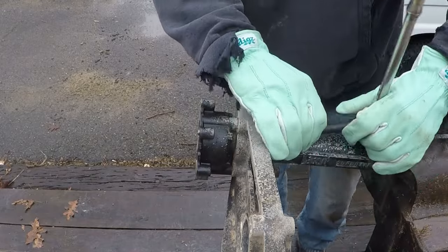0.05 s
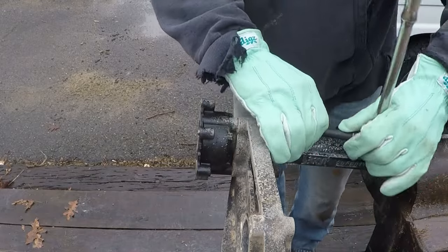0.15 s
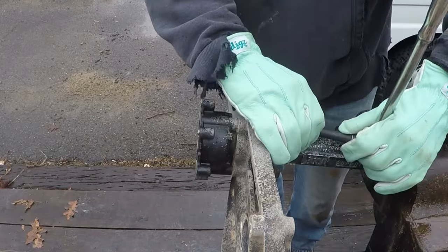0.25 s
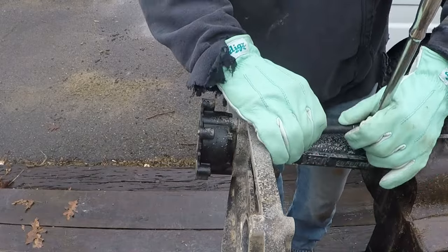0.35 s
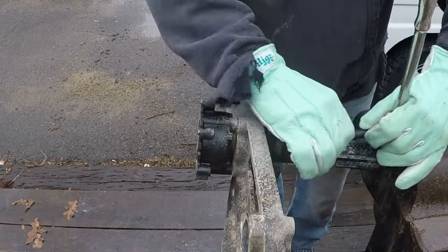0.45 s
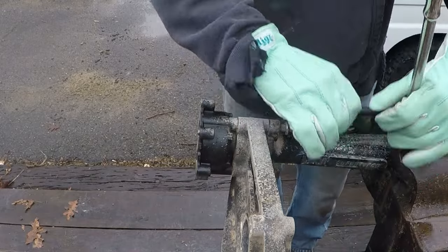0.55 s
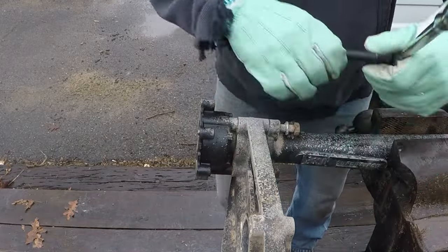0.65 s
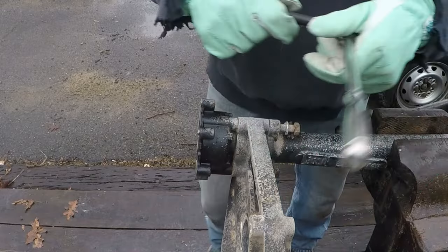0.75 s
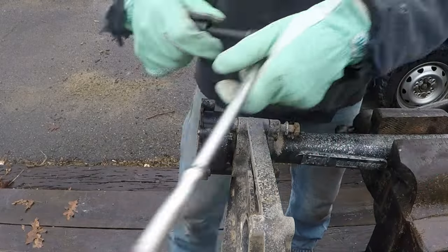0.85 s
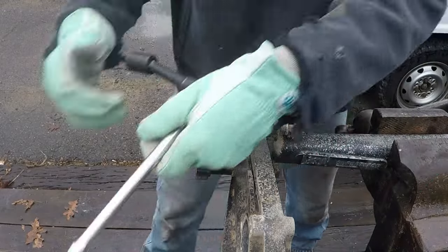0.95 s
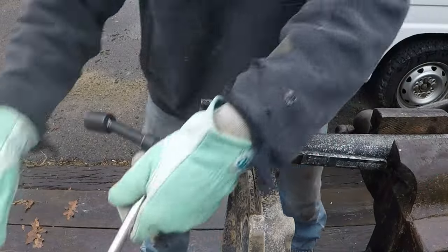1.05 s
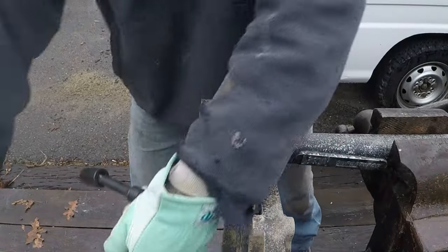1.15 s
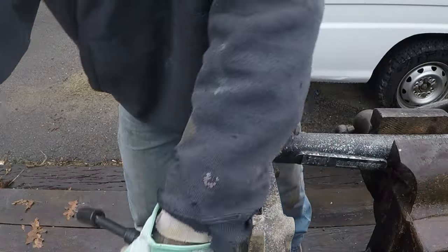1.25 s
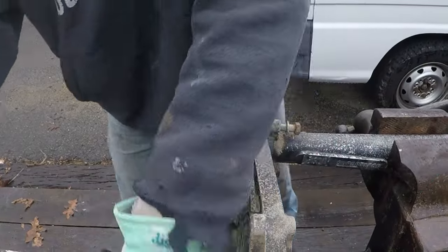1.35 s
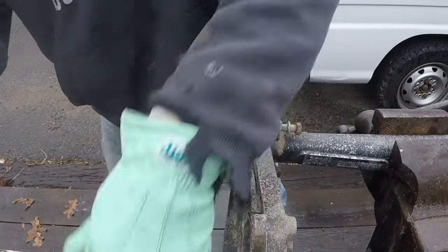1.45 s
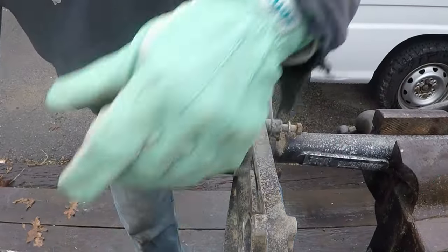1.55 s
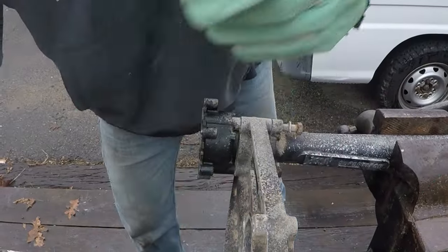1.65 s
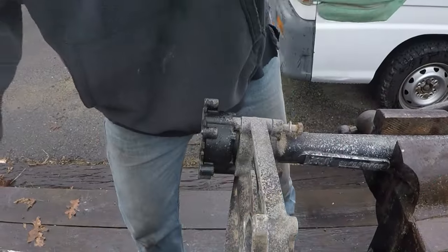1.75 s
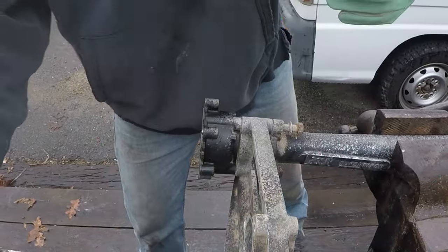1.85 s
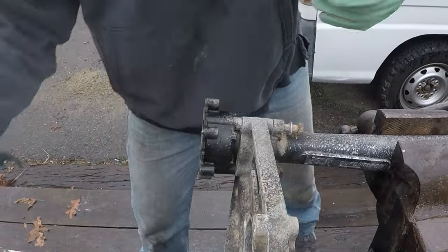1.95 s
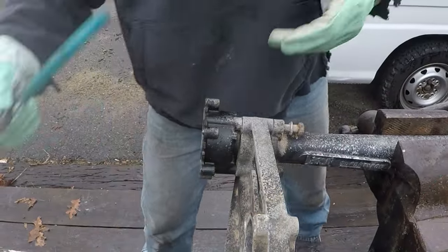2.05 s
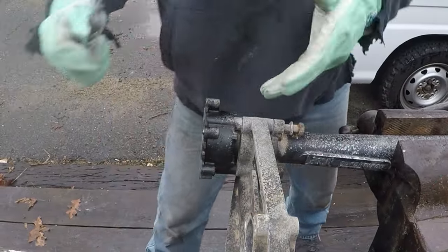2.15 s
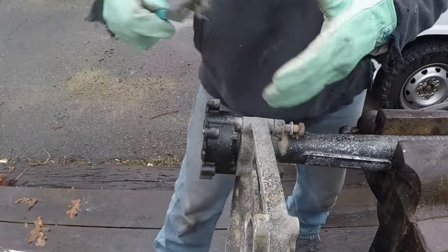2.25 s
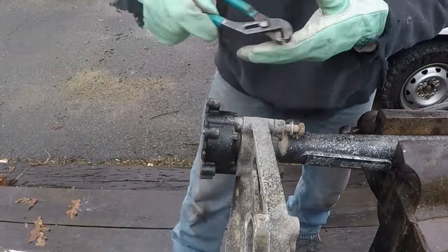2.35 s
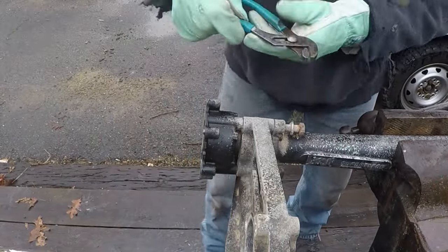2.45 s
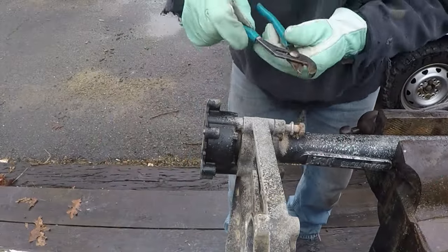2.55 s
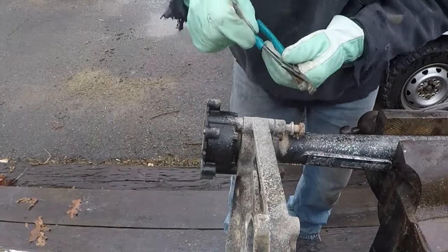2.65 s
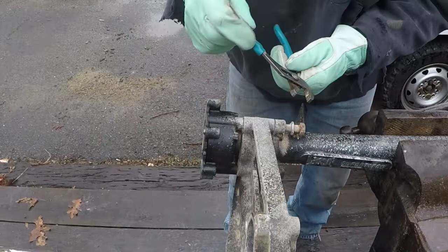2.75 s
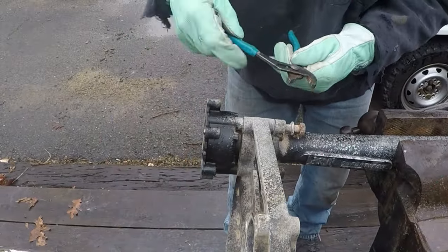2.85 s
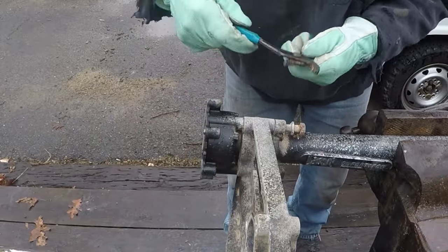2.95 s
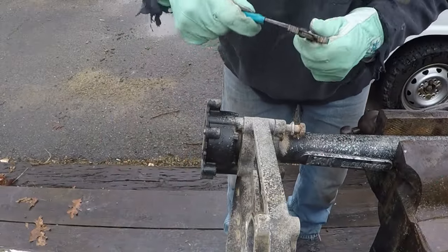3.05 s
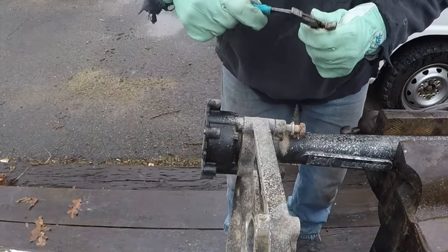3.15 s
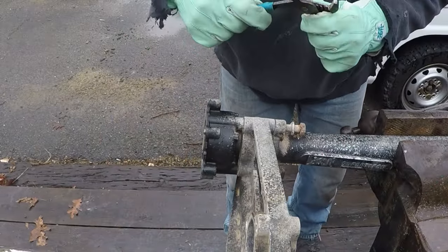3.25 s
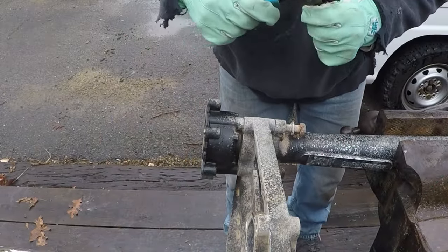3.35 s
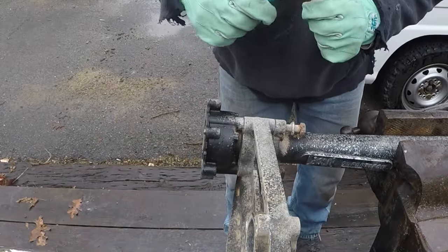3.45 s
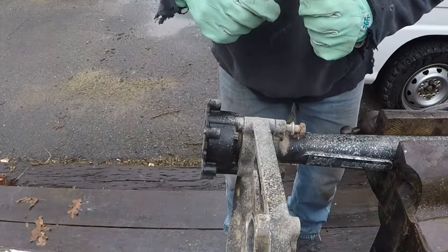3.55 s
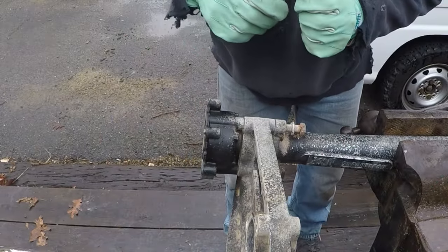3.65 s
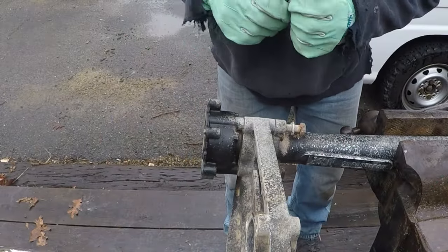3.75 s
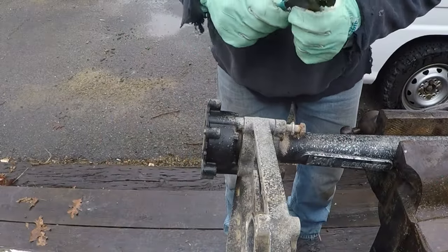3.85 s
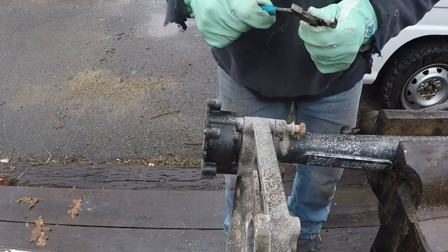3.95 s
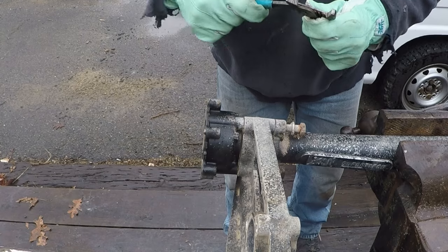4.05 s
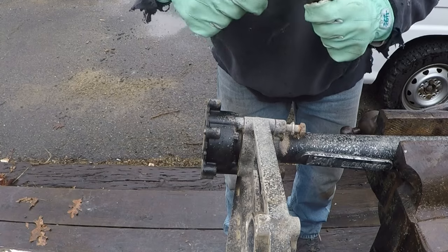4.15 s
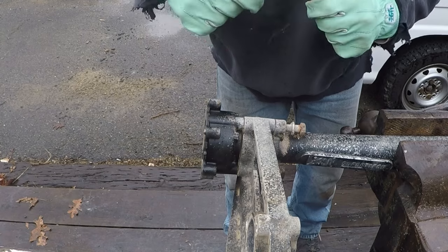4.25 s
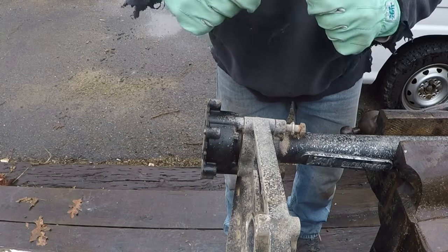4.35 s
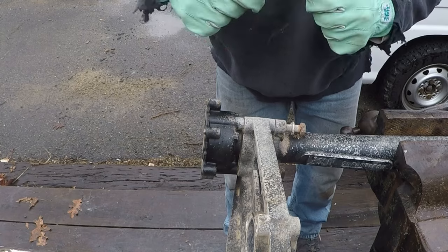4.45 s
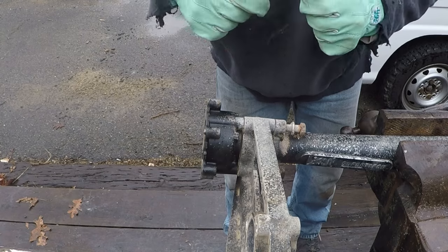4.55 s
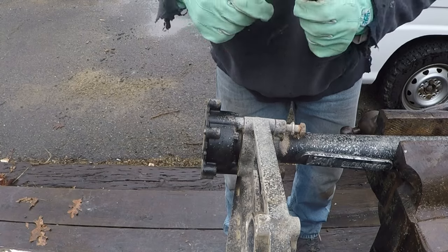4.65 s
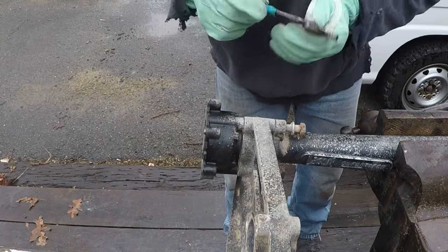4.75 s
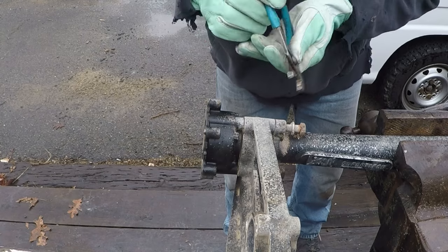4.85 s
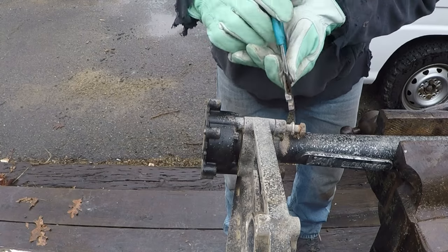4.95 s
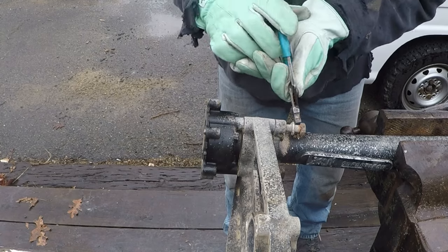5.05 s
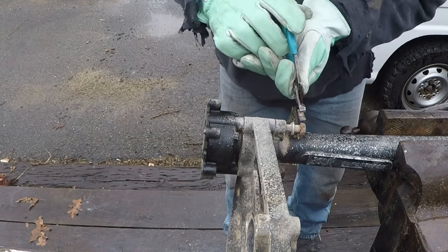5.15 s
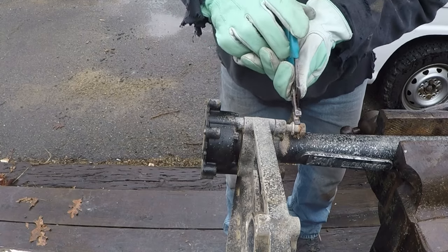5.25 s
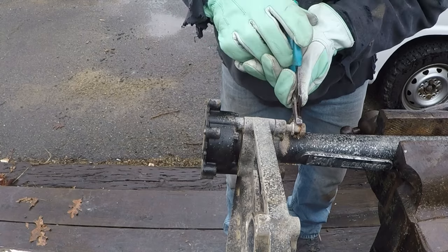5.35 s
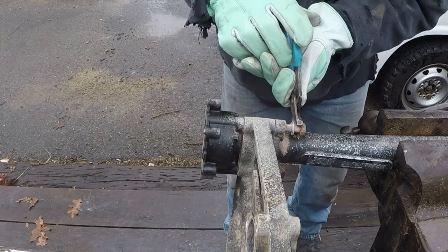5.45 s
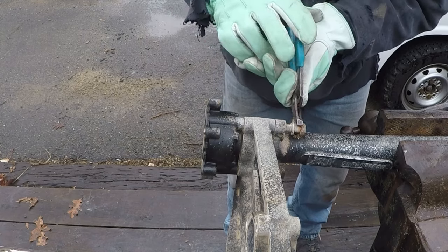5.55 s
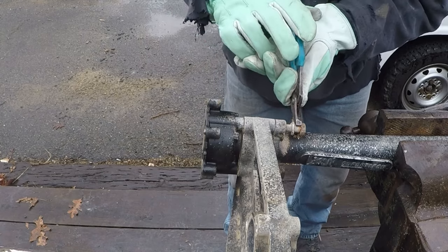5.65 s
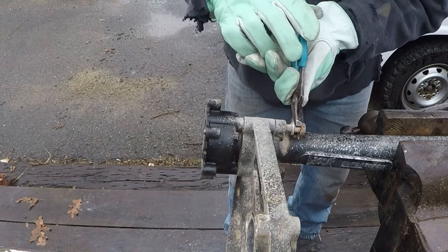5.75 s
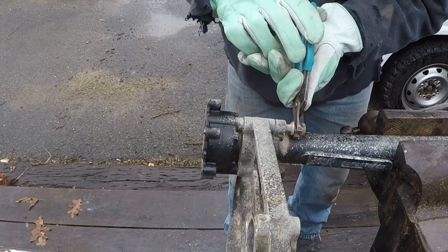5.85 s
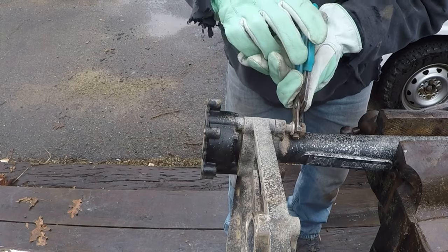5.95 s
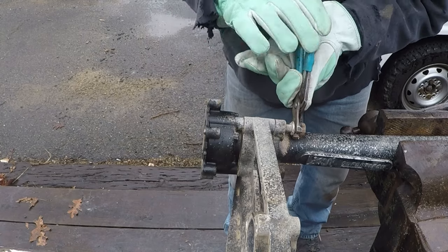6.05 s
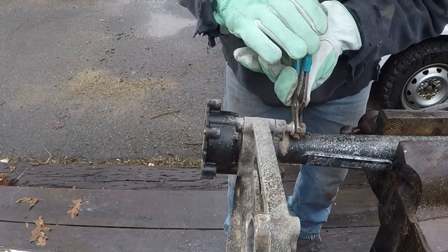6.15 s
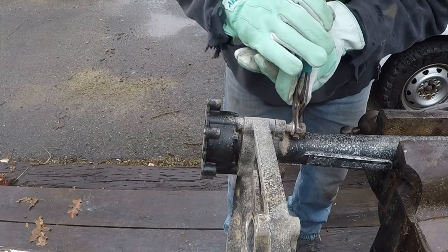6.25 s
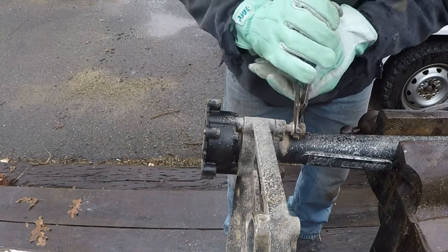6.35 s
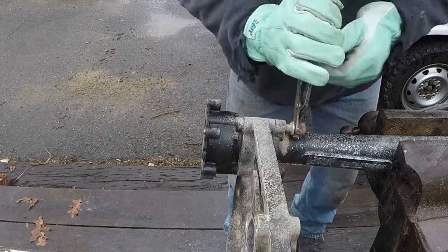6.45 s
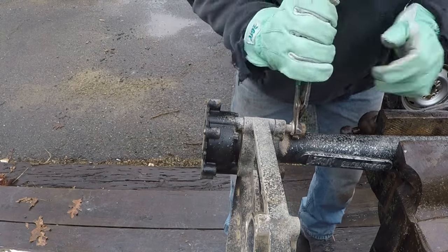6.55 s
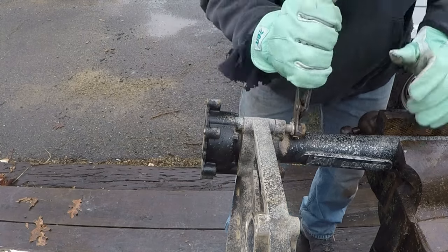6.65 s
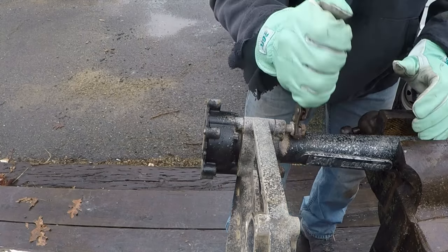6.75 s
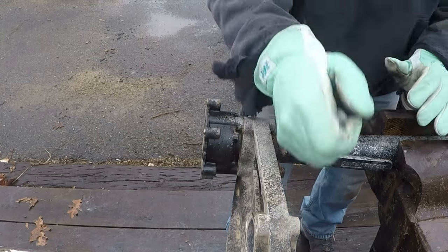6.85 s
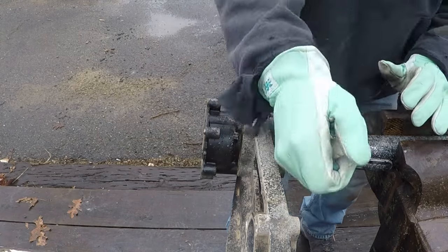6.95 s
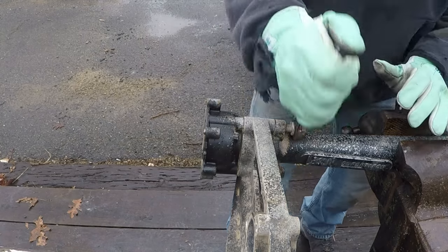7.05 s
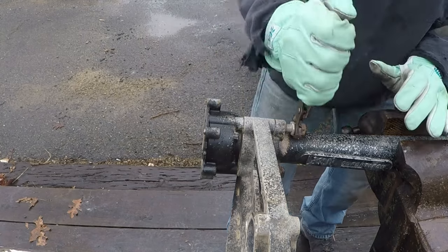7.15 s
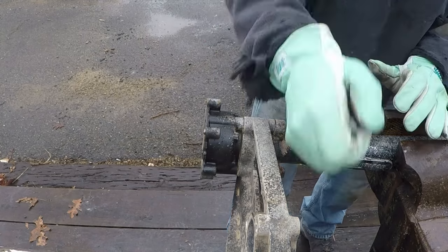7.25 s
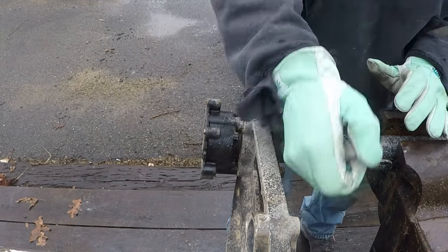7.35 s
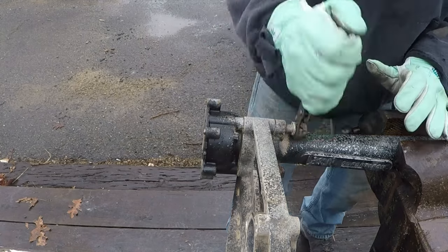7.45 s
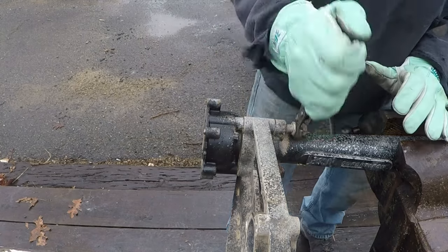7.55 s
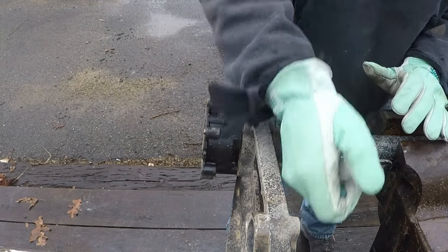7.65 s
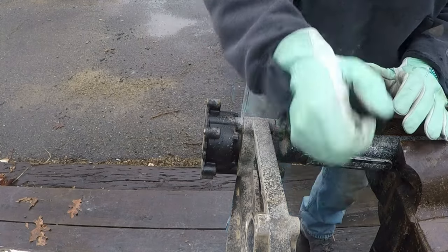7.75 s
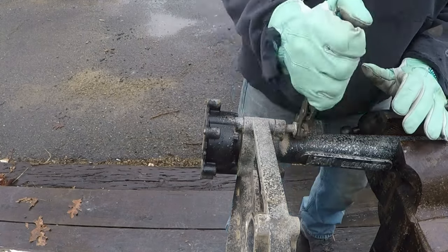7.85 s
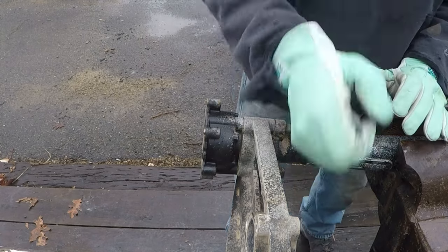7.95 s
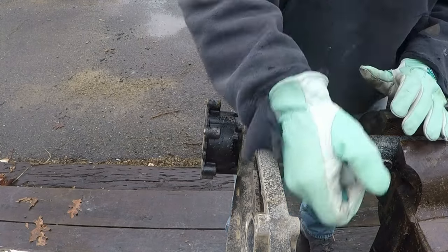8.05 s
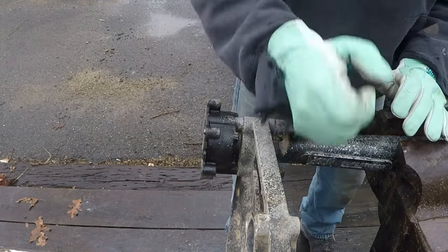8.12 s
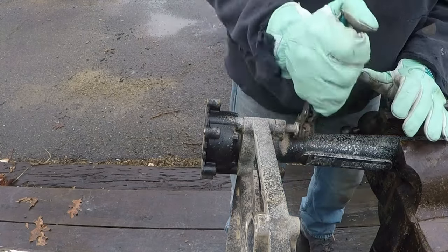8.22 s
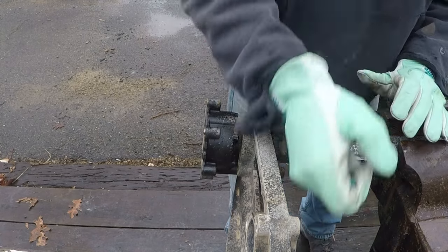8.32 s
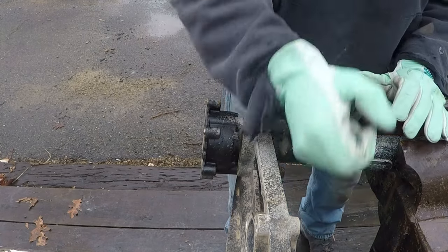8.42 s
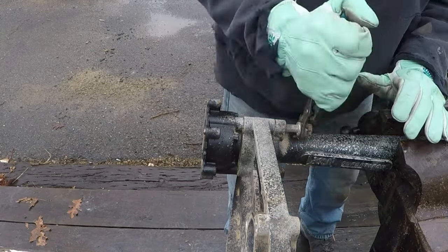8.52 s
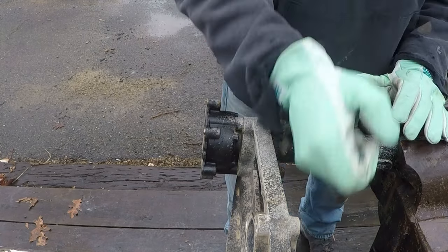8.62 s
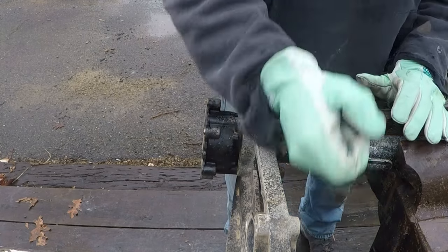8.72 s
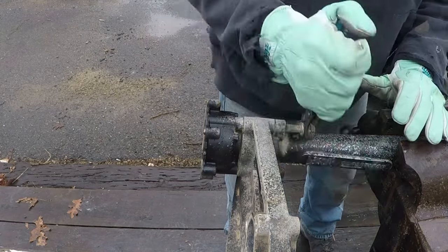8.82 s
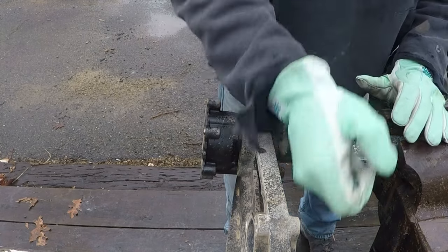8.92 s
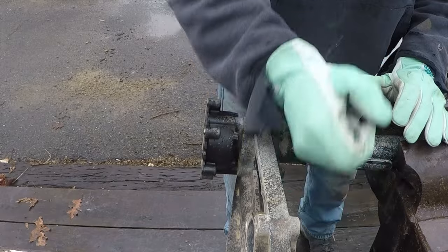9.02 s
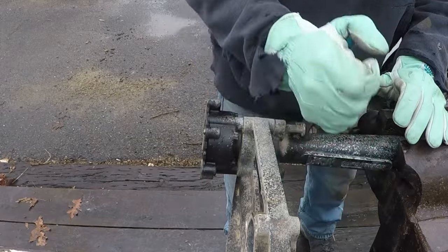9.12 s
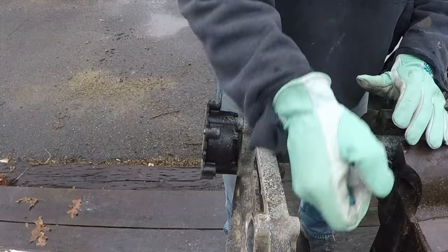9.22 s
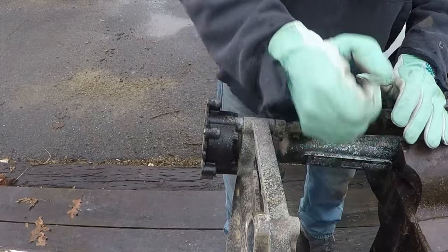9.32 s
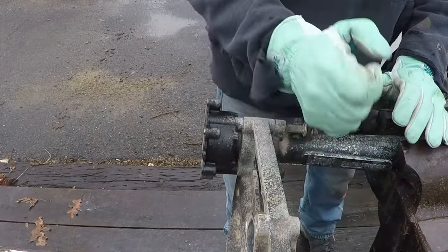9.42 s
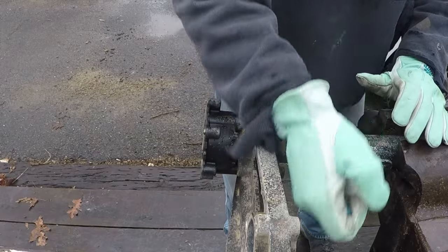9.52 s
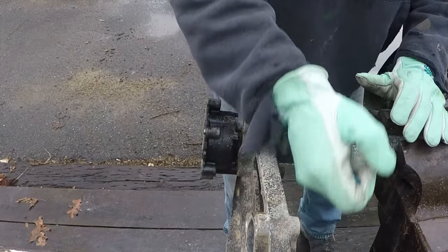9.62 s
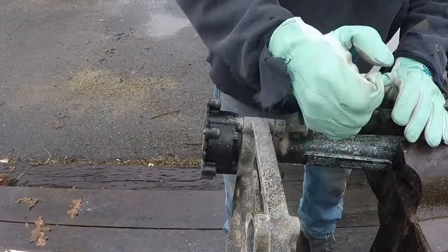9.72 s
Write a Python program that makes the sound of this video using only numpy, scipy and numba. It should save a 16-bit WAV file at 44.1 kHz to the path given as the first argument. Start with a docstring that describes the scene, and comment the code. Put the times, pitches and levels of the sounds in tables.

```python
"""Outdoors, on a trailer deck: a corroded bolt is worked out of an outboard leg lying there.
A far drone is filtered noise plus a thin whine; rubs are band noise; pushes excite modes of the swaying deck.
A wrench clinks and clatters on planks and pliers snap on: contact noise and struck modes.
The dry thread squeals in short stick-slip glides, a near sine that rings the housing.
The camera's gain control ducks the drone and lets it swell back."""
import sys
import numpy as np
from scipy import signal
from scipy.fft import rfft, irfft, next_fast_len
from scipy.io import wavfile
from scipy.ndimage import uniform_filter1d
from numba import njit

SR = 44100
rng = np.random.default_rng(int(sys.argv[2]) if len(sys.argv) > 2 else 0)


def output_pcm(signal):
    """Save a mono or channel-first signal as 16-bit PCM at the path in sys.argv[1].

    Samples are clipped to [-1, 1] before scaling.
    """
    pcm = np.clip(np.atleast_2d(signal).T, -1, 1) * 32767
    wavfile.write(sys.argv[1], SR, np.round(pcm).astype(np.int16))


N = 431298
T_S = np.arange(N) / SR

# All levels are relative, ahead of the source gains and the gain control.
# distant engines and traffic, spectral density: f/Hz, left level/dB, right level/dB
DRONE_SPECTRUM = [(30, -78, -69), (100, -73, -77), (159, -57, -60.5), (257, -63.5, -66), (287, -64.5, -56),
                  (352, -65.5, -76), (471, -54.5, -59), (517, -55.5, -58.5), (780, -50.5, -48),
                  (897, -60.5, -74), (1036, -50.5, -64), (1603, -59, -62.5), (1995, -54, -59.5),
                  (2214, -75, -69), (2390, -63.5, -70.5), (3580, -67, -76.5), (4720, -81, -77),
                  (6280, -68.5, -70.5), (9250, -82, -84.5), (11970, -99, -97.5), (15800, -120, -118)]
# swell and sink of the drone: t/s, level/dB
DRONE_LEVEL = [(0, -24.5), (1.9, -30), (3.9, -23.5), (6.4, -23.5), (7.5, -26), (9.78, -26)]
# mean pitch of a far machine's whine: t/s, f/Hz
WHINE_PITCH = [(0.0, 1047), (3.69, 1033), (4.53, 1041), (6.7, 1030)]
# gloves and sleeves dragging on the housing: t/s, length/s, level/dB
RUBS = [(-.02, .12, -20), (0.111, 0.077, -16), (0.18, 0.12, -20.5), (.372, 0.14, -17.5),
        (0.459, 0.13, -15.5), (0.502, 4, -37), (5.09, 0.18, -27), (5.287, 7.5, -37), (5.372, 0.095, -25),
        (5.487, 0.077, -29), (5.626, .12, -27.5), (5.788, .15, -22), (5.93, 0.083, -24),
        (8.99, 0.26, -21.5), (9.278, 0.098, -18.5), (9.45, .12, -28), (9.505, 0.13, -20.5),
        (9.61, 0.074, -22)]
# slow sway modes of the deck: f/Hz, level/dB, t60/s
SWAY_MODES = [(38, 8, .5), (75, 0, .17), (95, -3, .14), (145, -6, .1), (310, -12, .08)]
# single jolts of the deck: t/s, level/dB, length/s
JOLTS = [(0.555, -9.5, 0.02), (0.666, -14, 0.022), (1.107, -25.5, 0.0054), (1.352, 4, 0.0071),
         (1.477, -1.5, 0.006), (1.577, 3, 0.032), (2.6, -29, 0.011), (5.367, -5, 0.029), (5.637, -2, 0.034),
         (6.909, -6.5, 0.017)]
# pushes at the reversals of the tool: t/s, level/dB
STROKES = [(0, -14.5), (0.1, -3.5), (0.202, -5.5), (0.361, -11), (0.47, -7), (5.782, -12.5), (5.92, -18),
           (6.118, -21.5), (6.3, -22.5), (6.549, -17.5), (6.739, -22.5), (7.029, -9), (7.139, -10),
           (7.33, -5.5), (7.523, -6.5), (7.704, -5), (7.874, -4.5), (8.046, -4.5), (8.213, -5.5),
           (8.386, -4.5), (8.55, -6.5), (8.71, -6.5), (8.876, -8.5), (9.015, -6), (9.11, -6.5), (9.245, -9),
           (9.429, -11.5), (9.589, -7.5)]
# bumps of the work and landings of the wrench on the planks: t/s, level/dB, contact/s
THUMPS = [(.385, 1.5, .006), (.471, 3.5, 0.0054), (1.291, 14.5, 0.0022), (1.334, 23, 0.0034),
          (1.345, 24.5, 0.0037), (1.433, 27.5, 0.0038), (1.482, 17, .0027), (1.523, 15.5, 0.0029),
          (1.712, 14.5, 0.0072), (5.83, -13, .0025), (9.022, -5, .002), (9.172, -15, .001),
          (9.445, -12, .001)]
# low modes of the planks: f/Hz, level/dB, t60/s, phase between microphones/rad
PLANK_MODES = [(89, 0, 0.16, 0.91), (101.8, -2, .13, 1.3), (134, 0, 0.24, 2.7), (182, 5.5, 0.16, 2.45),
               (234, 2.5, 0.22, 2.93), (322, -1, .14, 2.05)]
# wrench and socket clattering on one board: t/s, level/dB, contact/s
CLACKS = [(1.28, -13, 0.00046), (1.287, 18.5, .0021), (1.323, 12, 0.0006), (1.327, 5, .0004),
          (1.346, 9, 0.00045), (1.35, 3, .0003), (1.359, 8, 0.00064), (1.39, 3, 0.0012),
          (1.419, 12.5, .0003), (1.423, 13, 0.00044), (1.429, 19, 0.0012), (1.437, 8, 0.00051),
          (1.456, 7, .0005), (1.487, 7, 0.0012), (1.529, 7, 0.0016), (1.543, -1, 0.0014)]
# modes of that board: f/Hz, level/dB, t60/s, phase between microphones/rad
BOARD_MODES = [(216, -3, 0.12, 2.6), (292, -7.5, 0.086, 2.36), (373, 0, 0.1, 2.9), (485, 2, .06, 2.43),
               (550, 2, 0.067, 2.9), (785, -16, 0.028, 1.1), (1095, -8, 0.035, 1.6),
               (1450, -5.5, 0.041, 1.5), (1620, -14, 0.027, 1)]
# clinks of the wrench: t/s, crack level/dB, lowest crack f/Hz, ring level/dB
CLINKS = [(.43, -30, 1300, -38), (0.466, -16, 1200, -10), (.482, -32, 3000, -27), (1.286, -24.5, 3500, -36),
          (1.326, -22, 1500, -38), (1.411, -19, 3000, -18), (1.418, -8, 3460, -6.5),
          (1.483, -6.5, 4230, -17), (1.519, -18, 3980, -14), (1.966, -30, 3420, -38),
          (2.22, -44, 3500, -41), (4.54, -42, 3500, -36)]
# modes of the wrench: f/Hz, level/dB, t60/s, phase between microphones/rad
WRENCH_MODES = [(3895, -9, .035, .3), (3960, -6.5, 0.054, .3), (4000, -17, 0.13, 1), (6650, -12, .06, 1),
                (6700, -7.5, 0.094, .95), (6800, -13, 0.037, 1.1), (7650, -21, .1, 1.2),
                (9580, -16, .05, 1.7)]
# pliers snapping shut, then seating on the bolt head: t/s, level/dB
SNAPS = [(5.042, -17.5), (5.367, -32.5)]
# modes of the pliers: f/Hz, level/dB, t60/s, phase between microphones/rad
PLIERS_MODES = [(1470, 4.5, 0.071, 1.5), (1620, -5, .04, 1.1), (3770, -15, .06, 1),
                (4290, -4.5, 0.038, 1.2), (5800, -8, 0.078, 1), (6550, -3, 0.066, 1.5),
                (7440, -7, 0.13, 1.2), (8750, -12, .04, 1.9), (10600, -14, 0.093, 1)]
# swelling thud of the gripped part: f/Hz, level/dB, t60/s, phase between microphones/rad
THUD_MODES = [(151, 18, 0.13, 2.2), (175.5, 33.5, 0.11, 2.62), (205.7, 13.5, 0.29, 2.65),
              (258, 18.5, 0.088, 2.6)]
# squeals of the thread, one curve each, held notes and jumps: t/s, f/Hz, level/dB
SQUEALS = [
    [(6.685, 4780, -31), (6.715, 4680, -27), (6.752, 4950, -23), (6.762, 5150, -14), (6.849, 5170, -12)],
    [(6.841, 5690, -10), (6.875, 5600, -14), (6.889, 5220, -11), (6.922, 5190, -18)],
    [(6.97, 4550, -24), (6.993, 5150, -13), (7.045, 5200, -11)],
    [(7.036, 5560, -8), (7.085, 5540, -8), (7.098, 5680, -11), (7.115, 5600, -18)],
    [(7.168, 4780, -24), (7.186, 5000, -16), (7.192, 5160, -9), (7.21, 5190, -10)],
    [(7.197, 6040, -8), (7.222, 5900, -13), (7.245, 5780, -11), (7.285, 5780, -24)],
    [(7.238, 5600, -14), (7.249, 5380, -8), (7.26, 5380, -15)],
    [(7.258, 4800, -21), (7.283, 5130, -10), (7.305, 5100, -18)],
    [(7.357, 5110, -7), (7.435, 5100, -6), (7.448, 5020, -5), (7.497, 5010, -12)],
    [(7.562, 5600, -14), (7.585, 5570, -9), (7.6, 5550, -12), (7.608, 5400, -11), (7.622, 5430, -18)],
    [(7.635, 4790, -15), (7.68, 4770, -20)],
    [(7.709, 5620, -6), (7.752, 5630, -10), (7.762, 5800, -8), (7.815, 5880, -9), (7.828, 6070, -4),
     (7.848, 6080, -8)],
    [(7.914, 5430, -18), (7.935, 5430, -17), (7.962, 5430, -24)],
    [(7.93, 4790, -27), (7.968, 4720, -22), (7.978, 4500, -8), (7.988, 4150, -20), (8.003, 4620, -14),
     (8.025, 4790, -23)],
    [(8.053, 4880, -20), (8.07, 5070, -10), (8.1, 5190, -8), (8.109, 5500, -9), (8.135, 5720, -8),
     (8.153, 6050, -6), (8.163, 6550, -10), (8.18, 6680, -12), (8.21, 6620, -21)],
    [(8.255, 5800, -11), (8.27, 5650, -7), (8.287, 5650, -13), (8.294, 5430, -7), (8.308, 5430, -15)],
    [(8.393, 4400, -19), (8.406, 5000, -9), (8.428, 5150, -9), (8.44, 5500, -7), (8.465, 5650, -11),
     (8.477, 6080, -6), (8.49, 6250, -10), (8.497, 6650, -5), (8.508, 6650, -11)],
    [(8.718, 3800, -11), (8.738, 4020, -14), (8.746, 4550, -9), (8.778, 4880, -12), (8.795, 5170, -7),
     (8.812, 5230, -15)],
    [(8.927, 3450, -11), (8.938, 3680, -13), (8.951, 4300, -14), (8.965, 4700, -22)],
    [(8.987, 4400, -15), (8.994, 4180, -10), (9.001, 3550, -10), (9.008, 2900, -15), (9.018, 2750, -22)],
    [(9.019, 3300, -13), (9.026, 3600, -9), (9.037, 3950, -13), (9.047, 4500, -5), (9.066, 4680, -18),
     (9.084, 5080, -9), (9.11, 5200, -16)],
    [(9.28, 3950, -21), (9.294, 4130, -20), (9.3, 4300, -9), (9.306, 4750, -6), (9.313, 4930, -8),
     (9.335, 5170, -5), (9.346, 5210, -9), (9.356, 5480, -13), (9.373, 5600, -19)],
    [(9.673, 4950, -21), (9.695, 4900, -20)],
    [(9.708, 4930, -24), (9.738, 4900, -29)],
]
# rust catching in the thread: t/s, length/s, strength/1
CATCHES = [(7.033, 0.0096, 0.43), (7.201, 0.033, 0.5), (7.758, 0.017, 0.28), (7.973, 0.034, 0.2),
           (8.42, 0.068, 1), (8.939, .02, 0.51), (8.986, 0.06, .8)]
# modes of the cast housing: f/Hz, level/dB
HOUSING_MODES = [(3470, 14), (3620, 12), (4010, -11), (4245, 10.5), (4570, 8.5), (4790, 1), (5013, -1),
                 (5091, -2), (5165, 3), (5250, -16), (5431, 5), (5540, 6), (5770, 8), (5940, 15.5),
                 (6075, 2.5), (6197, 19.5), (6620, 5)]

WHINE_DB = -6.5  # mean, against the drone
RUB_PEAK = 0.23  # share of a rub spent swelling
PUSH_S = 0.014
KNOCK_HZ, KNOCK_T60_S, KNOCK_DB = 73.9, 0.098, 3  # nominal pitch
KNOCK_SCATTER = 0.19  # largest relative pitch deviation
PLANK_RISE_S, BOARD_RISE_S, THUD_RISE_S = 0.036, 0.0095, 0.093
STEADY_ROUGH, ROUGH_PER_OCT_S = 0.08, 0.037  # held squeal; added per octave per second of glide
GLIDE_ROUGH, GRAIN_ROUGH = .55, 0.22  # most added by a glide; most added by a slow, low slip
JUMP_DB = -3  # level change at full roughness
SLUR_S, ROUGH_SLUR_S = 0.0044, .01  # smoothing of pitch and of roughness
SLIP_ATTACK_S, SLIP_RELEASE_S = .0085, .0085
CHATTER_HZ, CHATTER_DEPTH = 618, 1  # depth in rad, per unit of catch
OVERTONE_GROWTH, OVERTONE_FALL_DB_PER_HZ = .5, 0.3  # growth in dB per dB of squeal
TOP_HZ = 15300


def undb(db):
    """Decibels to gain."""
    return 10 ** (np.asarray(db) / 20)


def unit(x):
    """Scale to rms 1."""
    return x / np.sqrt(np.mean(x ** 2))


def walk(rate_hz, size=N):
    """Smooth random control, about rate_hz changes per second, spread about 1."""
    k = max(int(SR / rate_hz), 1)
    steps = np.repeat(rng.standard_normal(size // k + 1), k)
    return 1.418 * uniform_filter1d(uniform_filter1d(steps, k), k)[:size]


def slur(x, seconds):
    """Round off the corners of a control."""
    k = max(int(seconds * SR), 1)
    return uniform_filter1d(uniform_filter1d(x, k), k)


def add(out, start_s, x):
    """Mix x into out from start_s."""
    i = max(int(start_s * SR), 0)
    out[..., i:i + x.shape[-1]] += x[..., :N - i]


def decay(t60_s, size=SR):
    """Exponential decay, 60 dB in t60_s."""
    return np.exp(-np.log(1000) * T_S[:size] / t60_s)


def rise(t60_s, size=SR):
    """Exponential approach to 1: a body takes a few cycles to get moving."""
    return 1 - decay(t60_s, size)


def spread(pan_db):
    """Left and right levels in dB, pan_db apart."""
    return np.array([[pan_db], [-pan_db]]) / 2


def band_pass(order, low_hz, high_hz, x):
    """Butterworth band-pass."""
    return signal.sosfilt(signal.butter(order, [low_hz, high_hz], "band", fs=SR, output="sos"), x)


def ring(modes, size=SR):
    """Struck modes: decaying sines, lagging at the second microphone."""
    t = T_S[:size]
    out = np.zeros((2, size))
    for hz, db, t60_s, lag_rad in modes:
        out += undb(db) * decay(t60_s, size) * np.sin(2 * np.pi * hz * t - np.array([[0], [lag_rad]]))
    return out


def crack(low_hz, high_hz, t60_s, size=SR // 3):
    """Contact noise: a decaying band-passed burst."""
    noise = rng.standard_normal((2, size))
    return unit(band_pass(2, low_hz, min(high_hz, .45 * SR), noise)) * decay(t60_s, size)


def contact(length_s):
    """Half-sine push of unit area: the longer, the duller."""
    push = np.sin(np.linspace(0, np.pi, int(length_s * SR) + 3))
    return push / push.sum()


def drone(shared=0.32, swell_db=0.37, flicker_db=0.87, whine_right_db=-9, waver_hz=2.583, waver_db=2.4,
          right_lag_s=.00026):
    """Far engines off to the left: coloured noise in wavering bands, and one thin whine."""
    hz, left_db, right_db = np.transpose(DRONE_SPECTRUM)
    size = next_fast_len(N, True)
    f_hz = np.arange(size // 2 + 1) * SR / size + 1e-3
    colour = undb([np.interp(np.log(f_hz), np.log(hz), db) for db in (left_db, right_db)])
    common, *own = rfft(rng.standard_normal((3, size)))
    lag = np.exp(-2j * np.pi * f_hz * np.array([[0], [right_lag_s]]))
    # the bass is most alike at the two microphones
    share = np.clip(shared + 1.75 / (1 + (f_hz / 700) ** 2), 0, 1)
    spectrum = colour * (np.sqrt(share) * common * lag + np.sqrt(1 - share) * np.array(own))
    edges_hz = [0, 400, 900, 2200, SR]
    bands = np.zeros((2, N))
    for low, high in zip(edges_hz, edges_hz[1:]):
        band = irfft(spectrum * (f_hz >= low) * (f_hz < high), size)[:, :N]
        bands += band * undb(flicker_db * walk(14))
    whine_hz = np.interp(T_S, *np.transpose(WHINE_PITCH)) + waver_hz * walk(40)
    phase = 2 * np.pi * np.cumsum(whine_hz) / SR
    whine = np.sqrt(2) * np.array([np.sin(phase), undb(whine_right_db) * np.sin(phase - 1.6)])
    level = undb(np.interp(T_S, *np.transpose(DRONE_LEVEL)) + swell_db * walk(2.72))
    return level * (unit(bands) + undb(WHINE_DB + waver_db * walk(22)) * whine)


def shuffle(low_hz=55, high_hz=160, side_db=-1, uneven_db=2.5, plank_hz=312, plank_q=7, plank_db=-15):
    """Dull rubbing through a resonant plank: uneven band noise, each rub swelling and dying away."""
    friction = rng.standard_normal((2, N))
    plank = signal.lfilter(*signal.iirpeak(plank_hz, plank_q, fs=SR), friction)
    mid, side = unit(band_pass(3, low_hz, high_hz, friction)) + undb(plank_db) * unit(plank)
    rub = unit(mid + undb(side_db) * side * np.array([[1], [-1]]))
    pressure = np.zeros(N)
    for start_s, length_s, db in RUBS:
        corners_s = [start_s, start_s + RUB_PEAK * length_s, start_s + length_s]
        pressure += undb(db) * np.interp(T_S, corners_s, [0, 1, 0])
    return rub * pressure * undb(uneven_db * walk(25))


def deck(sway_db=4.5, pan_db=-1.1, rattle_db=-18, knock_contact_s=0.0043):
    """Pushes and jolts sway the deck under the camera; the play knocks, loose planks shudder along."""
    force, knocks = np.zeros(N), np.zeros((2, N))
    for start_s, db, length_s in JOLTS:
        add(force, start_s, undb(db) * contact(length_s))
    size = SR // 4
    for start_s, db in STROKES:
        add(force, start_s, undb(db) * contact(PUSH_S))
        hz = KNOCK_HZ * (1 + KNOCK_SCATTER * np.tanh(rng.standard_normal()))
        knock = ring([(hz, KNOCK_DB, KNOCK_T60_S, .8)], size) * rise(0.1, size)
        add(knocks, start_s, undb(db) * signal.fftconvolve(knock, contact(knock_contact_s)[None]))
    body = ring([(hz, db, t60_s, .45) for hz, db, t60_s in SWAY_MODES]) * rise(0.3)
    sway = signal.oaconvolve(force[None], body)[:, :N] + knocks
    swing = np.sqrt(uniform_filter1d(sway[0] ** 2, SR // 25).clip(0))  # 40 ms rms
    shudder = unit(band_pass(2, 48, 125, rng.standard_normal((2, N))))
    return undb(sway_db + spread(pan_db)) * (sway + undb(rattle_db) * swing * shudder)


def thumps(thump_db=-8, scuff_db=-9, size=SR // 3):
    """Bumps and landings on the planks: low modes and scuff noise, dulled by the contact time."""
    out, planks = np.zeros((2, N)), ring(PLANK_MODES, size)
    for start_s, db, contact_s in THUMPS:
        blow = (planks + undb(scuff_db) * crack(93, 500, t60_s=0.17)) * rise(PLANK_RISE_S, size)
        add(out, start_s, undb(db + thump_db) * signal.fftconvolve(blow, contact(contact_s)[None]))
    return out


def clatter(rattle_db=-12, rattle_t60_s=0.08, size=SR // 3):
    """Wrench and socket on one board: its modes and rattle noise, dulled by the contact time."""
    out, board = np.zeros((2, N)), ring(BOARD_MODES, size)
    for start_s, db, contact_s in CLACKS:
        blow = (board + undb(rattle_db) * crack(300, 1700, rattle_t60_s)) * rise(BOARD_RISE_S, size)
        add(out, start_s, undb(db) * signal.fftconvolve(blow, contact(contact_s)[None]))
    return out


def clinks():
    """Clinks of the wrench: ringing steel modes under a crack of contact noise."""
    out, wrench = np.zeros((2, N)), ring(WRENCH_MODES, SR // 3)
    for start_s, crack_db, low_hz, ring_db in CLINKS:
        add(out, start_s, undb(ring_db) * wrench + undb(crack_db) * crack(low_hz, 6500, t60_s=0.034))
    return out


def snaps(crack_db=1, size=SR // 3):
    """Pliers snap over centre: their modes, a crack, and a swelling thud of the gripped part."""
    out, pliers = np.zeros((2, N)), ring(PLIERS_MODES, size)
    thud = rise(THUD_RISE_S, size) ** 3 * ring(THUD_MODES, size)
    for start_s, db in SNAPS:
        add(out, start_s, undb(db) * (pliers + thud + undb(crack_db) * crack(3400, 8300, t60_s=0.045)))
    return out


def catching(now_s):
    """Strength of the rust's catch: a triangle per event."""
    return sum(np.interp(now_s, [at_s, at_s + span_s / 2, at_s + span_s], [0, strength, 0])
               for at_s, span_s, strength in CATCHES)


def roughness(glide_hz, slow, catch):
    """Irregularity of the slip, 0 to 1: grows with glide speed, slow slip and catch."""
    oct_per_s = np.abs(np.gradient(np.log2(glide_hz))) * SR
    sliding = np.minimum(ROUGH_PER_OCT_S * oct_per_s, GLIDE_ROUGH)
    rough = STEADY_ROUGH + sliding + GRAIN_ROUGH * slow + catch / 2
    return slur(np.minimum(rough, 1), ROUGH_SLUR_S)


def thread(wander=0.005, rasp=0.036, flutter_db=2.8, rough_db=6, second_db=-16, third_db=-37,
           fold_db=-31, bite_db=9, fold_hz=29200, scrape_db=-20, usual_db=-10):
    """Stick-slip in the dry thread: a near sine steps between notes, rasps in jumps, chatters in catches."""
    out = np.zeros(N)
    for squeal in SQUEALS:
        times_s, pitches_hz, levels_db = np.transpose(squeal)
        t = T_S[:int((times_s[-1] - times_s[0]) * SR)]
        size = len(t)
        now_s = times_s[0] + t
        glide_hz = slur(np.interp(now_s, times_s, pitches_hz), SLUR_S)
        level_db = np.interp(now_s, times_s, levels_db)
        catch = catching(now_s)
        slow = np.clip((5200 - glide_hz) / 1500, 0, 1)
        rough = roughness(glide_hz, slow, catch)

        hz = glide_hz * (1 + wander * walk(118.8, size) + rasp * rough * walk(1500, size))
        chatter = 2 * np.pi * CHATTER_HZ * t + walk(200, size)
        phase = 2 * np.pi * np.cumsum(hz) / SR + CHATTER_DEPTH * catch * np.sin(chatter)

        grip = np.clip(np.minimum(t / SLIP_ATTACK_S, (t[-1] - t) / SLIP_RELEASE_S), 0, 1)
        grip = grip * (1 + CHATTER_DEPTH * catch * np.cos(chatter) / 2)
        flutter = flutter_db * np.tanh(walk(130.0, size))
        grain = rough_db * rough * np.tanh(walk(550, size))
        grip = grip * undb(level_db + JUMP_DB * rough + flutter + grain)

        # slow slips stick longer, so overtones bite harder; loud ones too; high notes lose them
        growth = OVERTONE_GROWTH * np.maximum(level_db - usual_db, -6)
        fall = OVERTONE_FALL_DB_PER_HZ * np.maximum(glide_hz - 5650, 0)
        bite = undb(bite_db * slow + growth - fall)
        second = undb(second_db) * np.sin(2 * phase)
        third = undb(third_db) * np.sin(3 * phase) * np.clip((4900 - glide_hz) / 300, 0, 1)
        # third harmonic folded back from the top of the band: runs against the pitch
        folded = np.sin(2 * np.pi * fold_hz * t - 3 * phase) * np.clip((glide_hz - 4600) / 500, 0, 1)
        # rust crumbling in a catch
        scrape = undb(scrape_db) * bite * catch ** 2 * crack(3200, 8000, t60_s=0.39)[0, :size]
        tone = np.sin(phase) + bite * (second + third) + undb(fold_db) * folded
        add(out, times_s[0], grip * (tone + scrape))
    return out


def bolt(t60_s=0.097, direct_db=-4.0, ring_db=-3.0, phase_spread_rad=0.92, scatter_db=-9,
         scatter_t60_s=0.19, pan_db=-3.5):
    """Squeal heard directly and through the housing, whose modes ring on and beat with each glide."""
    squeal = thread()
    phases = phase_spread_rad * rng.standard_normal((len(HOUSING_MODES), 2, 1))
    tail = 2 * decay(t60_s) / decay(t60_s).sum()
    modes = sum(undb(db) * tail * np.cos(2 * np.pi * hz * T_S[:SR] + phase)
                for (hz, db), phase in zip(HOUSING_MODES, phases))
    # weaker modes and near reflections, as decaying noise
    scatter_tail = decay(scatter_t60_s)
    scatter = rng.standard_normal((2, SR)) * scatter_tail / np.linalg.norm(scatter_tail)
    response = undb(ring_db) * modes + undb(scatter_db) * scatter
    rung = signal.oaconvolve(squeal[None], response)[:, :N]
    direct = np.array([np.roll(squeal, 1), squeal])  # left one sample late
    return (undb(direct_db) * direct + rung) * undb(spread(pan_db))


def scene():
    """All sources at the two microphones."""
    return drone() + shuffle() + deck() + thumps() + clatter() + clinks() + snaps() + bolt()


@njit
def overload(peak, attack_s, release_s, charge_s, hold_s, recover_s, start):
    """Gain divisor: a quick follower charges a slow one, which holds and then lets go."""
    out, quick, slow, wait_s = np.empty(len(peak)), 1., start, 0.
    for i in range(len(peak)):
        if peak[i] > quick:
            quick += (peak[i] - quick) / (attack_s * SR)
        else:
            quick -= quick / (release_s * SR)
        wait_s -= 1 / SR
        if quick > slow:
            slow += (quick - slow) / (charge_s * SR)
            wait_s = hold_s
        elif wait_s < 0:
            slow = max(1., slow - slow / (recover_s * SR))
        out[i] = max(quick, slow)
    return out


def gain_control(x, ceiling_db=-8.0, attack_s=0.0049, release_s=0.116, charge_s=0.676, hold_s=0.13,
                 recover_s=0.94, start_db=3):
    """The camera turns loud sound down within milliseconds and comes back up slowly."""
    peak = np.abs(x).max(axis=0) / undb(ceiling_db)
    return x / overload(peak, attack_s, release_s, charge_s, hold_s, recover_s, float(undb(start_db)))


def record(dry):
    """Gain control, soft rounding of the peaks it lets through, and the top cut."""
    held = gain_control(dry)
    rounded = held / (1 + np.abs(held) ** 6) ** (1 / 6)
    return signal.sosfilt(signal.ellip(8, .2, 70, TOP_HZ, fs=SR, output="sos"), rounded)


dry = scene()
out = record(dry)
output_pcm(out)
```